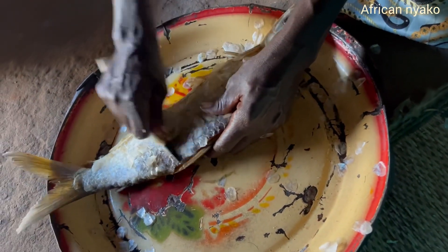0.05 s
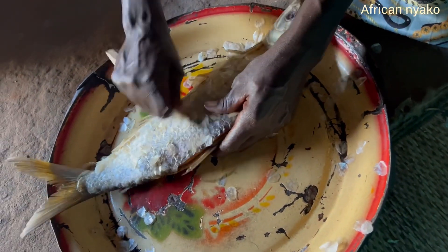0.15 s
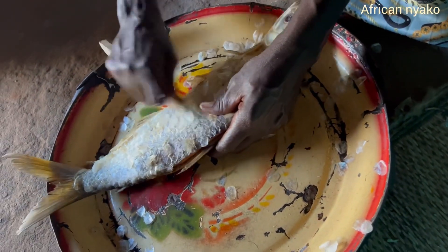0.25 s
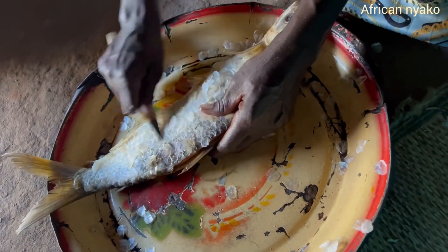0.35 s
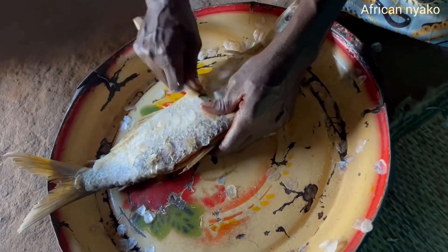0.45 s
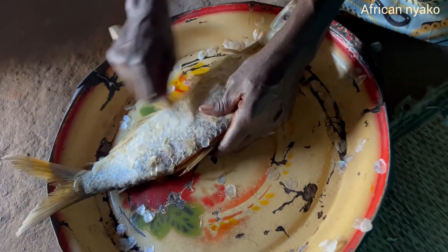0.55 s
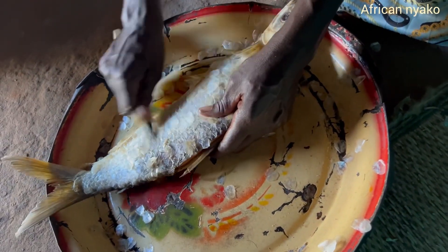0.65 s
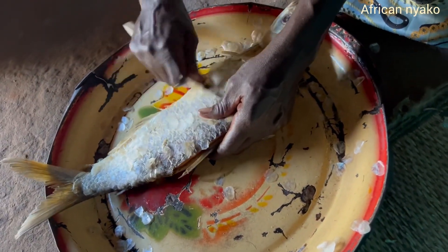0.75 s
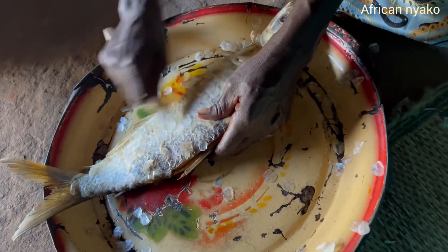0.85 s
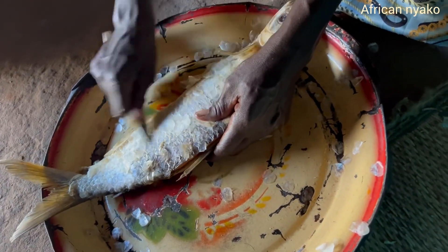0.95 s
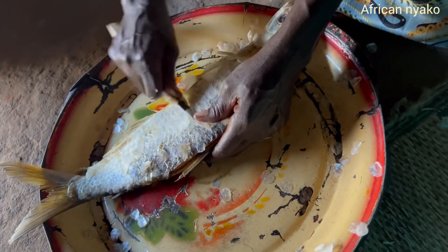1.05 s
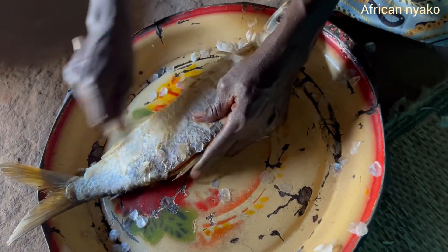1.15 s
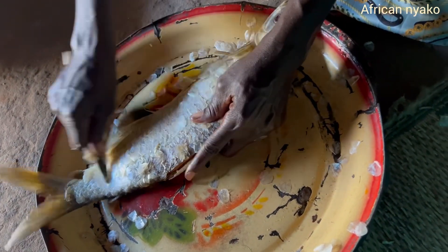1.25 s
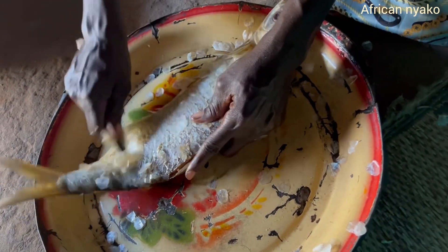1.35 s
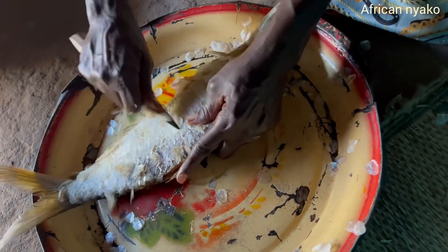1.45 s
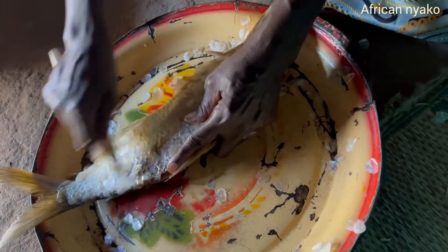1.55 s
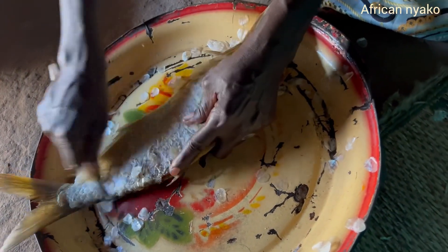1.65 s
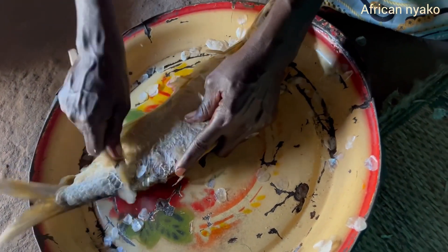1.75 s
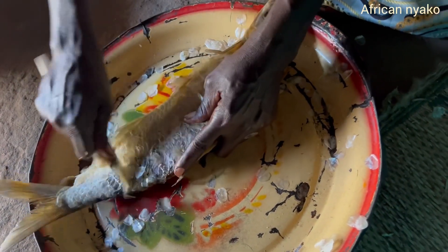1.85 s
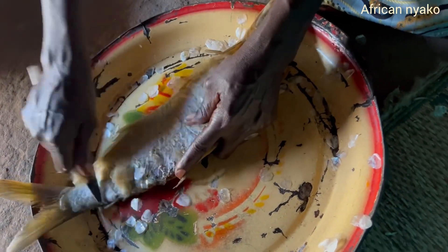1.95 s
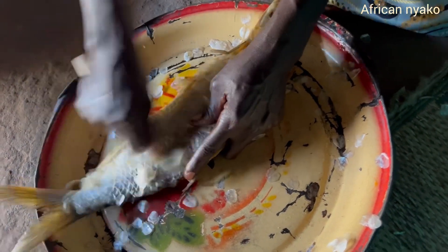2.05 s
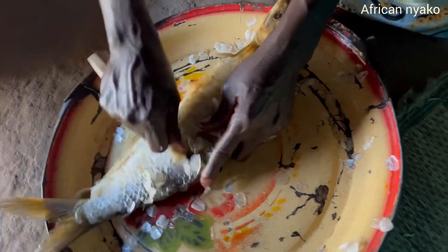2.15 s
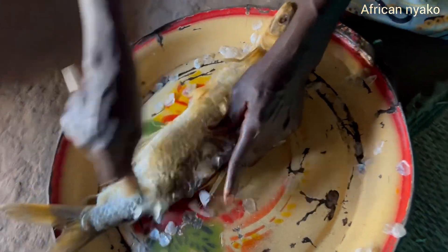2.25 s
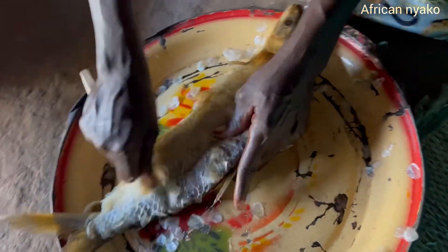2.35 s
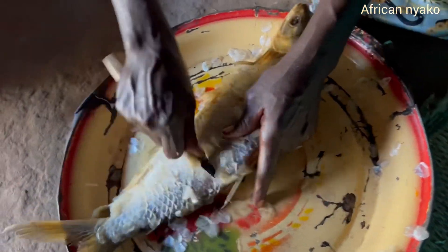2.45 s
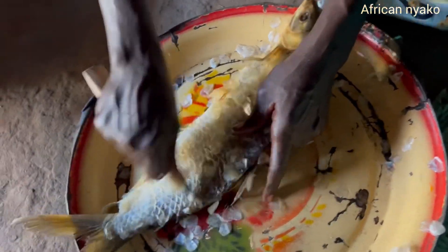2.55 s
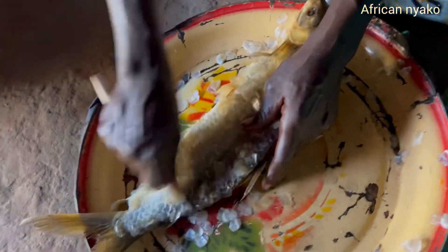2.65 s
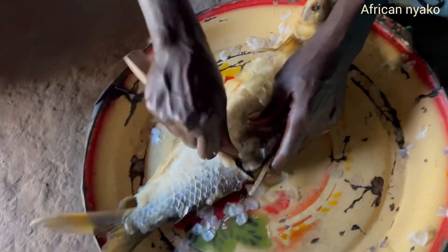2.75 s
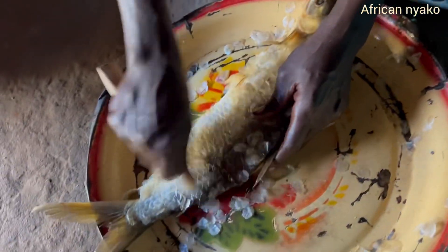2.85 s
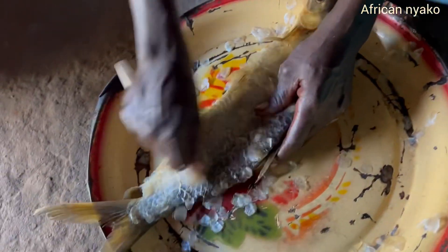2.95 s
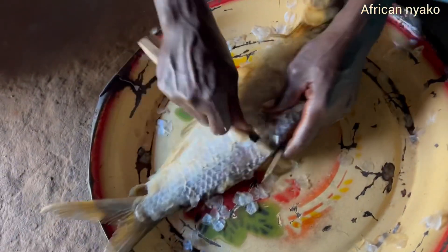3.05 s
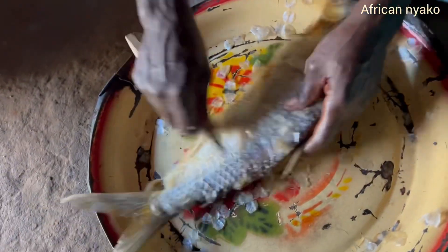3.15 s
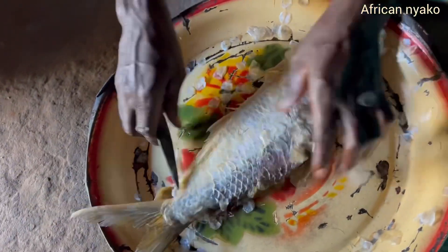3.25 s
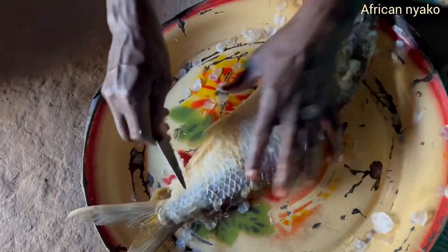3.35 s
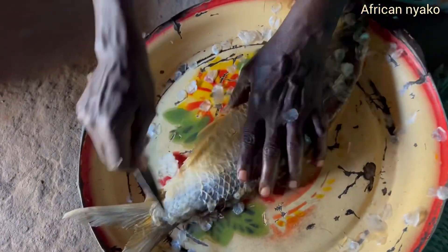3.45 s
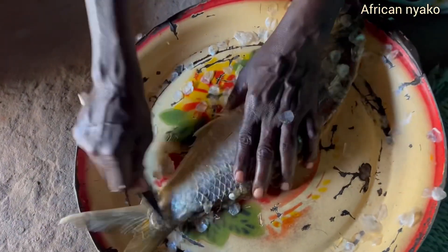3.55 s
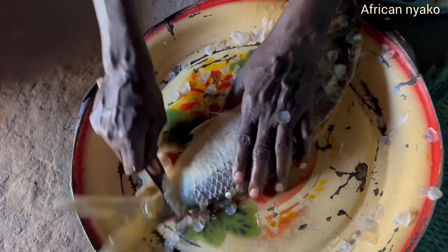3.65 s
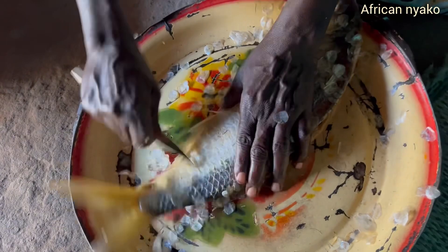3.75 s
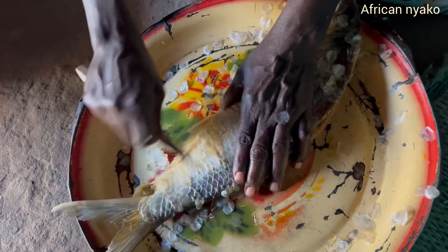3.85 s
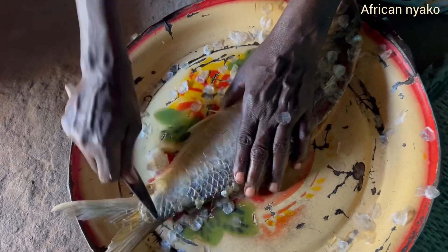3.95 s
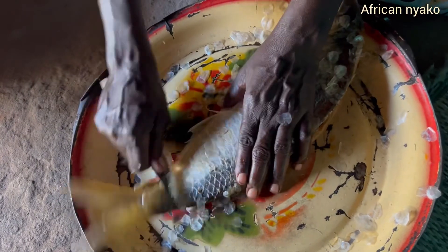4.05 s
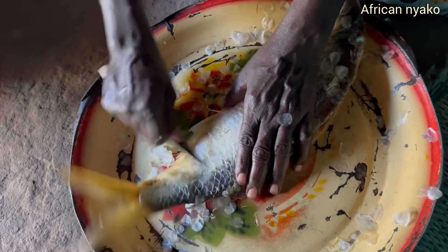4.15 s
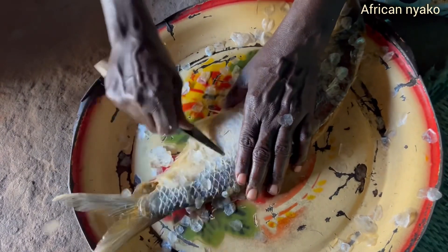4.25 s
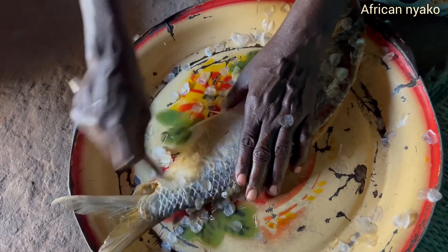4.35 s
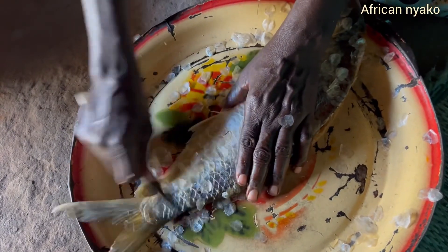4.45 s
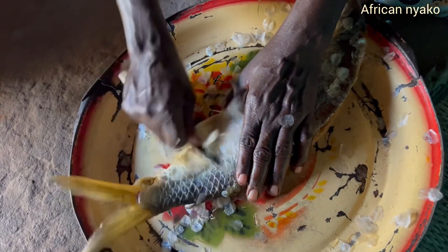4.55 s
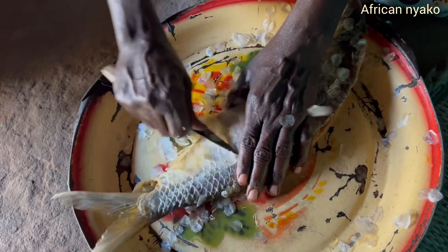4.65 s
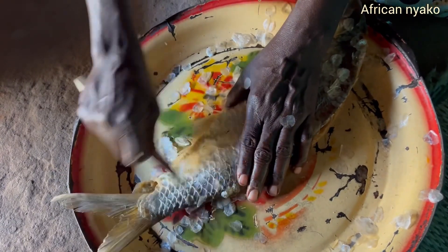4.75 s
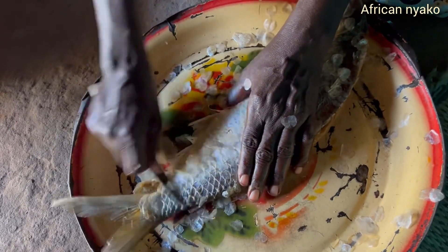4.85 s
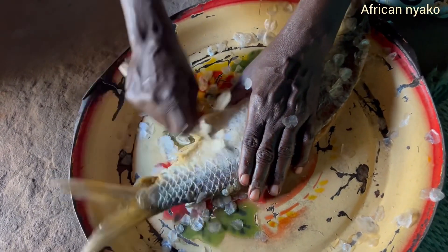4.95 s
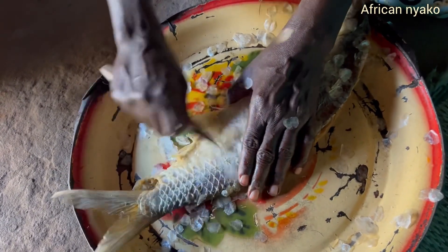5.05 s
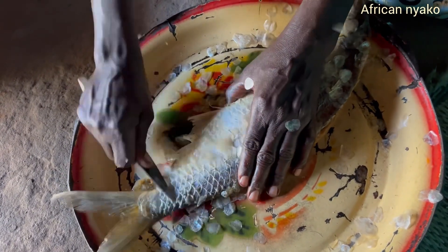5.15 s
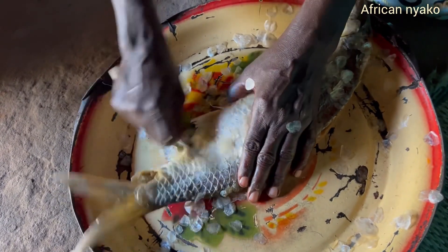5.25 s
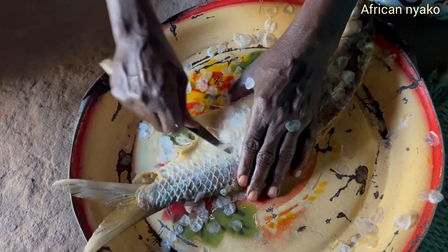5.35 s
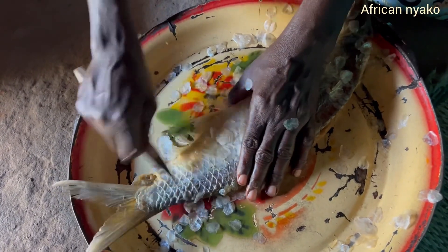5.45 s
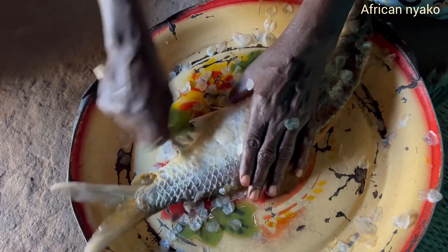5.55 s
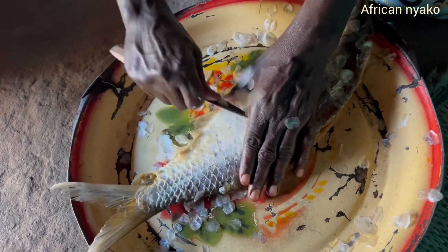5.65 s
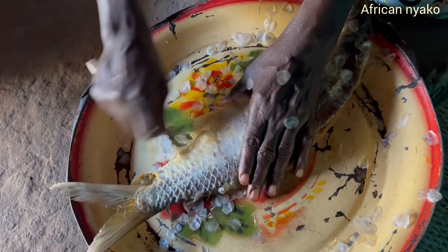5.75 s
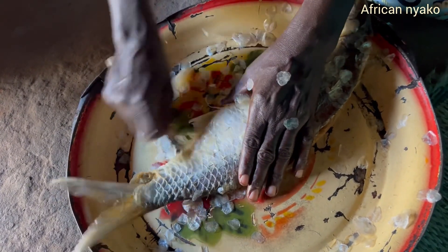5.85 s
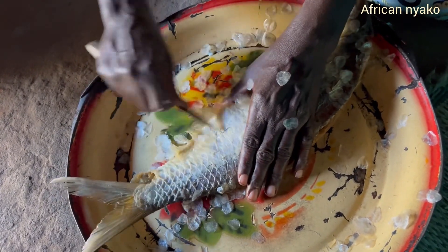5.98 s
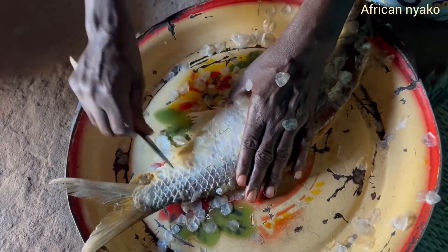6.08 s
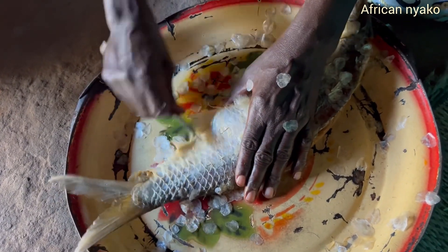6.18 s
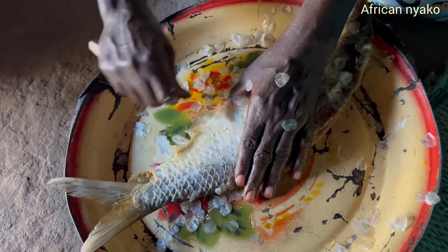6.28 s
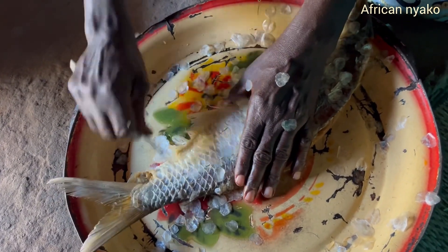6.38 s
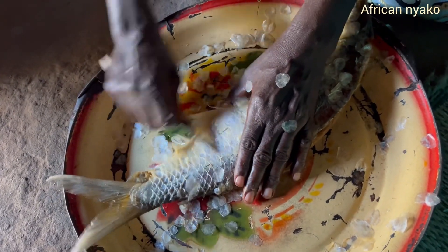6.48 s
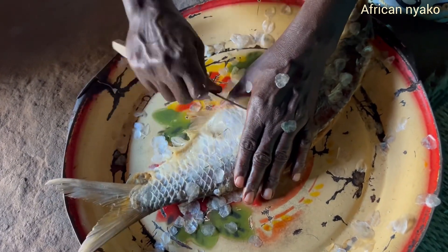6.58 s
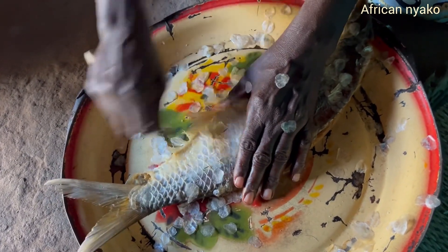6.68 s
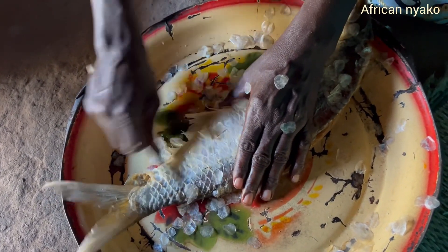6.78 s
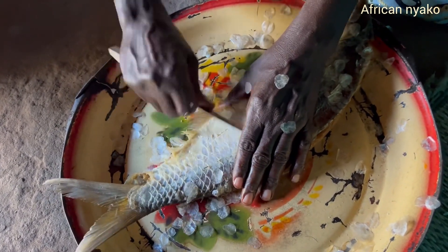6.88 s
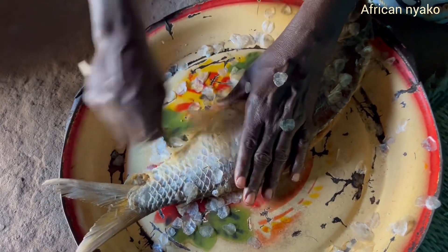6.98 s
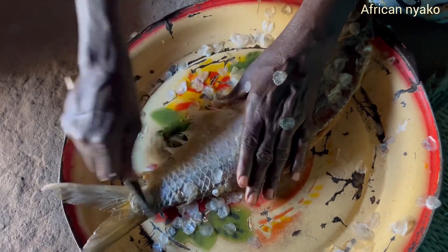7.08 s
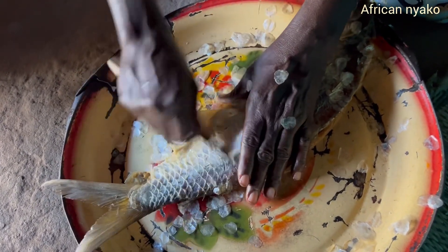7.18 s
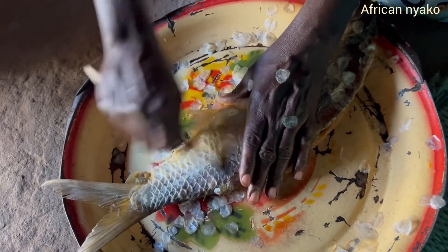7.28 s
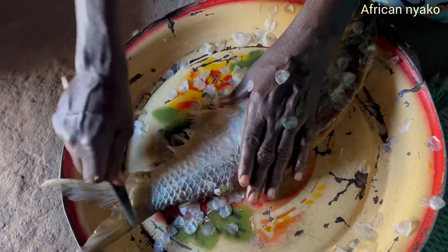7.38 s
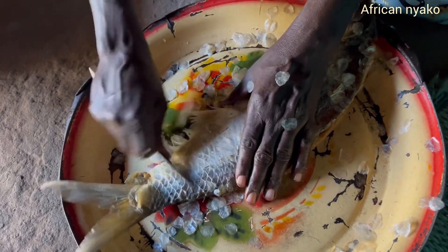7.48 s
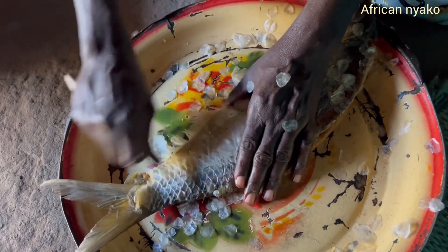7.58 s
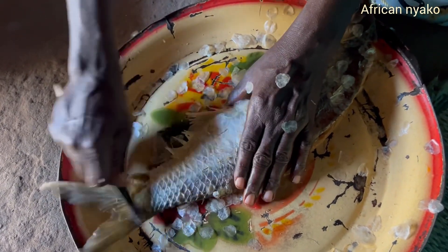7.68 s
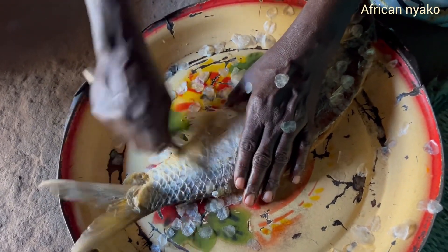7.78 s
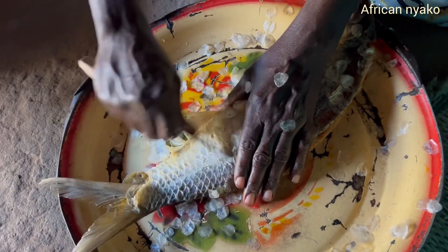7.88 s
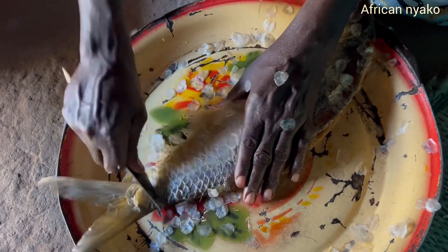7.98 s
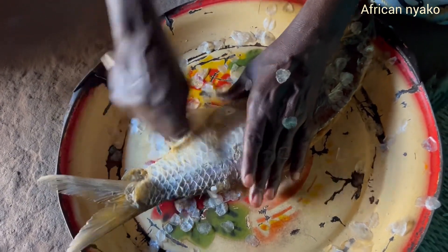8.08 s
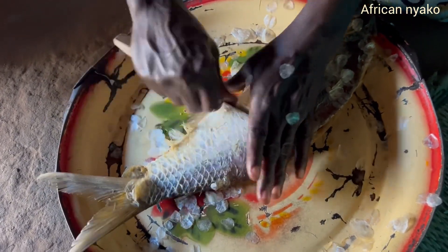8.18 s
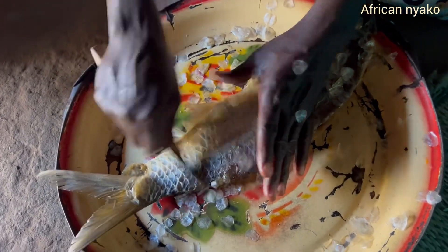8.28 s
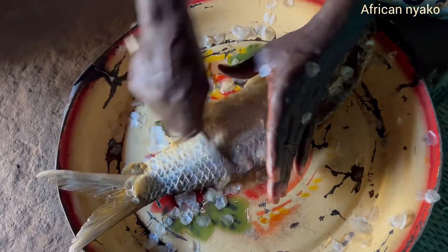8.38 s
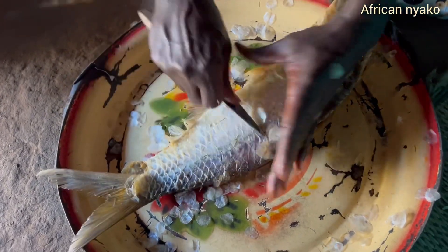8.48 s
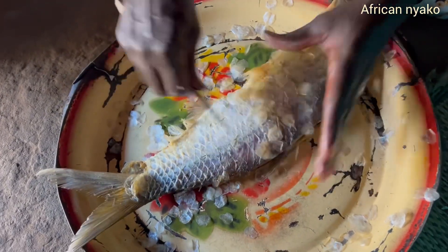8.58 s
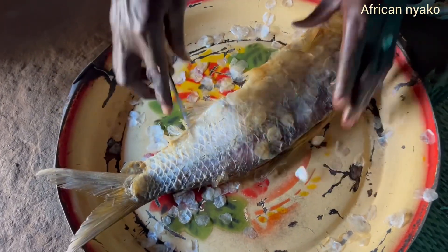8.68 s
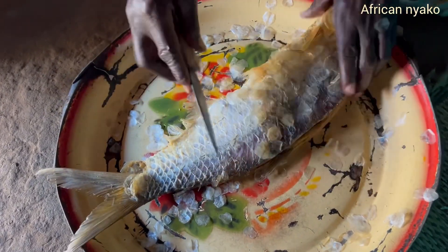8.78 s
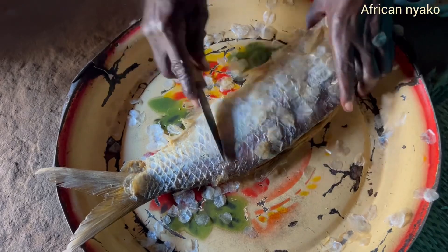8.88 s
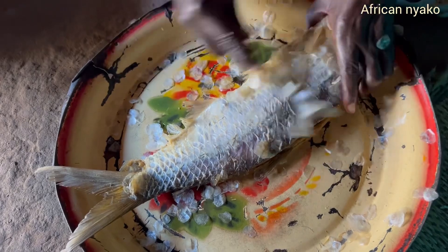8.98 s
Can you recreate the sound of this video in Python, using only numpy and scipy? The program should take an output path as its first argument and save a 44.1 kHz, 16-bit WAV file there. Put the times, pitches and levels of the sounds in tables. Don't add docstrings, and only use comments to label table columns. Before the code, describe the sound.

From the first instant a knife scrapes scales off a stiff dried fish on an enamel tray, very close to a small stereo microphone in an open yard with only a short, faint reflection. Strokes come about three a second, each a gritty bright rasp with small snaps of scales and a short metallic tray rattle. Sharp knocks stand out around 0.3, 0.65, 0.95 and 1.4 s. From 2 to 4 s the scraping is drier and crisper, with lighter bumps. From about 4.4 s strokes fall more regularly and the fish drums with hollow low thuds, strong at 4.9, 5.5 and 5.8 s. The hardest clacking strike comes at 6.4 s. Thudding strokes continue to 8 s, then scraping becomes lighter and sparser until 9 s. A low distant engine drone rises slowly in pitch beneath, with soft throbs; faint high bird peeps come near 6, 6.3 and 7.3 s.

```python
import sys
import numpy as np
from scipy import signal
from scipy.fft import rfft, irfft, next_fast_len
from scipy.io import wavfile
from scipy.ndimage import uniform_filter1d, map_coordinates

SR = 44100
rng = np.random.default_rng(int(sys.argv[2]) if len(sys.argv) > 2 else 0)


def elevation(decibels):
    levels = np.asarray(decibels, float)
    return 10 ** (levels / 20)


def int16_out(signal):
    q = np.round(np.clip(np.atleast_2d(signal).T, -1, 1) * 32767)
    wavfile.write(sys.argv[1], SR, q.astype(np.int16))


N = 397776


def unit(x):
    return x / np.sqrt(np.mean(x ** 2) + 1e-20)


def along(points, hz):
    f, v = np.transpose(points)
    return np.interp(np.log(hz + 1), np.log(f + 1), v)


def curves(rows):
    s, *cols = np.transpose(rows)
    return [np.interp(np.arange(N) / SR, s, c) for c in cols]


def wobble(rate):
    knots = rng.standard_normal(int(N * rate / SR) + 4)
    return map_coordinates(knots, [np.arange(N) * rate / SR])


def filtered(x, response):
    m = next_fast_len(N + SR // 2)
    return irfft(rfft(x, m) * response(np.fft.rfftfreq(m, 1 / SR)), m)[..., :N]


def colour(spectrum):
    return lambda f: unit(elevation(along(spectrum, f)))


def body(modes, plain_db, low_hz, high_hz):
    def response(f):
        peaks = 0
        for k, (centre, width, db) in enumerate(modes):
            damping = 1j * f * width
            peaks = peaks + (-1) ** k * elevation(db) * damping / (centre * centre - f * f + damping)
        band = (1j * f / (low_hz + 1j * f)) ** 2 * (high_hz / (high_hz + 1j * f)) ** 2
        whole = (peaks + elevation(plain_db)) * band
        return whole / np.sqrt(np.mean(np.abs(whole) ** 2))
    return response


def distance():
    # start_s, pitch_hz, level_db
    engine = [
        (0, 123, -58),
        (.9, 123.3, -48),
        (3.85, 134.2, -44.5),
        (4.0, 132.2, -56),
        (5.5, 138.8, -50),
        (7.5, 140, -52.5),
        (9.02, 139.3, -58),
    ]
    # centre_s, pitch_hz, level_db, half_length_s
    passing = [
        (.4, 85, -54.5, 0.34),
        (2.5, 99, -45, 0.18),
        (5.2, 103, -49, 0.3),
        (7.196, 99, -45, .15),
        (8.3, 58, -48.5, 0.31),
    ]
    # start_s, level_db
    rumble_level = [
        (0.0, -44.5),
        (2.11, -45),
        (5.78, -47),
        (6.51, -49.5),
        (7.06, -44),
        (8.79, -47),
        (9.02, -39),
    ]
    # pitch_hz, density_db (per Hz)
    rumble_spectrum = [(20, -35.5), (35, -25.5), (55, 3.5), (110, -0.5), (150, -3.5), (220, -19.5),
                       (400, -62.5)]
    # pitch_hz, density_db (per Hz)
    air_spectrum = [(100, -9), (200, -11.5), (500, -8.5), (1500, -2), (3000, -13), (9000, -35.5),
                    (16000, -24)]

    t = np.arange(N) / SR
    note_hz, note_db = curves(engine)
    phase = 2 * np.pi * np.cumsum(note_hz + 0.58 * wobble(6)) / SR
    note = elevation(note_db - 0.5 + 2.3 * wobble(8.4)) * np.sin(phase)
    throbs = 0
    for s, hz, db, half in passing:
        throbs = throbs + elevation(db + 3.5) * np.exp(-((t - s) / half) ** 4) * np.sin(2 * np.pi * hz * t)
    rumble = filtered(rng.standard_normal(N), colour(rumble_spectrum))
    air = filtered(rng.standard_normal(N), colour(air_spectrum))
    return note + throbs + elevation(curves(rumble_level)[0] - 4.5) * rumble + elevation(-73 + 2.2 * wobble(7.5)) * air


def grains(rate, spread_db, t60, bed):
    size_db = spread_db * np.minimum(rng.exponential(size=N), 4)
    slips = (rng.random(N) < rate / SR) * elevation(size_db)
    shape = signal.lfilter([1], [1, -elevation(-60 / (t60 * SR))], slips)
    return unit((bed + unit(shape)) * rng.standard_normal(N))


def bursts(events, levels_db, t60, blur=None):
    out, t = np.zeros(N + SR), np.arange(SR // 8) / SR
    for (s, *_, hz), db in zip(events, levels_db):
        puff = rng.standard_normal(len(t))
        if blur:
            puff = np.sin(2 * np.pi * hz * t + blur * np.cumsum(puff))
        start = round((s - .0015) * SR)
        out[start:][:len(t)] += elevation(db - 60 * t / t60) * (1 - np.exp(-t / .0004)) * puff
    return out[:N]


def patchy(x, depth_db):
    z = signal.stft(x, nperseg=256)[2]
    field = uniform_filter1d(rng.standard_normal(z.shape), 4, axis=0)
    field = uniform_filter1d(field, 14, axis=1)
    return signal.istft(z * elevation(depth_db * unit(field)), nperseg=256)[1][:N]


def knife():
    # start_s, rasp_db, tray_over_rasp_db
    strokes = [(0.0, -77, -2), (0.052, -36.5, 2.5), (0.299, -49.5, 1), (0.317, -52.5, 16.5),
               (0.367, -45, 12), (0.419, -45.5, 1), (0.511, -47.5, 6), (0.601, -66, 3), (0.614, -65.5, 4.5),
               (0.624, -48, 13), (0.666, -34, 9), (0.691, -43.5, 6.5), (0.883, -64, 3),
               (0.913, -48.5, 21.5), (0.965, -31.5, 2.5), (1.048, -58.5, 5.5), (1.202, -71, 11),
               (1.227, -45, -1), (1.247, -34.5, 0), (1.384, -39, -3.5), (1.412, -28, 7),
               (1.537, -69.5, 3.5), (1.601, -44, 6), (1.639, -32, -1.5), (1.806, -52.5, -1.5),
               (1.886, -43.5, -1.5), (2.075, -34, -0.5), (2.227, -53.5, -2.5), (2.312, -48.5, 0.5),
               (2.372, -32, -10.5), (2.442, -52.5, 8.5), (2.532, -54.5, 6.5), (2.569, -28.5, -14),
               (2.579, -56, 1), (2.619, -56.5, 1), (2.671, -28, -14.5), (2.746, -53.5, 9.5),
               (2.841, -39.5, -6.5), (2.906, -55.5, 7), (2.948, -41, 4), (3.173, -30, 2),
               (3.223, -42.5, -1.5), (3.34, -51, -4), (3.392, -39.5, 0), (3.492, -65, 1),
               (3.522, -39.5, -4), (3.704, -42, -5), (3.727, -42, -3.5), (3.789, -46, 2.5), (3.934, -81, 8),
               (3.959, -46.5, 2), (4.093, -43, -2.5), (4.121, -32, -17.5), (4.18, -40.5, -3.5),
               (4.25, -61.5, -1.5), (4.39, -67, 3), (4.412, -54, 2.5), (4.472, -28, -5.5),
               (4.787, -75.5, 5), (4.809, -41, 9), (4.844, -54.5, 8), (4.891, -25.5, -13), (5.121, -74, 5),
               (5.158, -42, 8), (5.186, -45.5, 8.5), (5.295, -32.5, -7), (5.345, -54.5, 11),
               (5.44, -59.5, -1), (5.48, -49, 8), (5.572, -36.5, -4.5), (5.762, -92, 17.5),
               (5.832, -42.5, 4), (5.874, -26.5, -3.5), (5.909, -43.5, -7), (6.084, -75, 2),
               (6.096, -67, 0), (6.109, -31, 17), (6.124, -24.5, 5.5), (6.395, -90, 2), (6.413, -84, 19),
               (6.433, -23, 11.5), (6.672, -81.5, 0), (6.735, -80, 6.5), (6.755, -49, 11.5),
               (6.842, -38, -4), (7.024, -77.5, 0), (7.061, -45.5, 7), (7.116, -42, 6), (7.323, -65, 1),
               (7.336, -78.5, -2.5), (7.348, -41, 1), (7.381, -47, 6.5), (7.441, -40.5, 2),
               (7.608, -68.5, -0.5), (7.638, -48, 0), (7.735, -39.5, 7), (7.9, -66, -0.5),
               (8.034, -51.5, 14), (8.114, -40.5, -2), (8.159, -53, 1.5), (8.311, -61, 8.5),
               (8.381, -37.5, -5), (8.521, -63.5, -4), (8.693, -59.5, 0), (8.703, -45, 0),
               (8.715, -42, 4.5), (8.832, -58, -0.5), (9.02, -32.5, -9.5)]
    # peak_s, peak_db, crack_over_peak_db, ring_hz
    snaps_and_knocks = [(0.022, -54, -8, 810), (0.0383, -15.5, -4, 1450), (0.07, -20, 4, 1575),
                        (0.3194, -6.5, -44, 1620), (0.3569, -10.5, -30, 1494), (0.6258, -7.5, -36, 1510),
                        (0.6569, -8.5, -24, 3470), (0.7158, -19.5, -3, 802), (0.8989, -18.5, -27, 1540),
                        (0.9133, -38, -13, 1540), (0.9522, -5, -14, 3475), (1.2136, -29.5, -19, 1360),
                        (1.2352, -15.5, -17, 3510), (1.3534, -13.5, 2.5, 3510), (1.4088, -4, -2, 1070),
                        (1.589, -26, -6, 2300), (1.6053, -12.5, -4.5, 1254), (1.8863, -19, -19, 1300),
                        (2.0198, -19, 9, 2960), (2.0632, -9.5, -6, 830), (2.3184, -27, -5, 850),
                        (2.3575, -16, 5, 1333), (2.3725, -15, 4.5, 1360), (2.54, -35, 8, 2460), (2.5544, -25, 0, 2440),
                        (2.6548, -22.5, 2, 942), (2.829, -30.5, 5, 1530), (2.9854, -15, 6.5, 2475),
                        (3.2395, -22.5, -1, 807), (3.3852, -23, -6, 974), (3.515, -24, -6, 897), (3.72, -21, 8, 1520),
                        (3.7446, -23, 4, 1660), (3.7773, -11, -7.5, 1097), (3.9598, -23, 2, 1090),
                        (4.0023, -22.5, 4, 1260), (4.016, -17, 1, 990), (4.121, -8, -8.5, 1630),
                        (4.412, -19, -7, 1310), (4.7357, -32.5, -5.5, 1330), (4.8078, -17, -1, 1123),
                        (4.866, -16.5, -5, 850), (4.8923, -12, 1, 770), (4.922, -13.5, 2, 1680),
                        (5.1582, -9, -19, 1460), (5.2473, -18.5, 0, 1560), (5.2837, -30.5, -7, 2440),
                        (5.2967, -20, -4, 2710), (5.476, -19, -6, 1200), (5.5119, -21.5, -14, 1040),
                        (5.5615, -14.5, -2, 2330), (5.8267, -14.5, -9, 1380), (5.8593, -16, -6, 796),
                        (6.109, -6.5, -25, 1460), (6.1594, -5, -24, 1260), (6.1953, -16.5, 6, 1310),
                        (6.428, 4.5, -27, 1476), (6.7552, -21, -7, 1140), (6.8282, -16.5, -4, 3300),
                        (6.8516, -19.5, 4.5, 846), (7.0492, -15.5, -10, 1136), (7.3468, -18, -4, 1130),
                        (7.4393, -15.5, 0, 867), (7.64, -18.5, -10, 1154), (7.9798, -26.5, 0, 1120),
                        (8.2656, -30, 8.5, 2190), (8.357, -27, 1, 1590), (8.388, -21, -1, 1190),
                        (8.7032, -19, -12, 1170), (8.8643, -29, -20, 1350), (8.911, -30.5, -15, 1320),
                        (8.961, -25.5, -3, 770),
                        (4.1765, -16, -9, 1110), (4.59, -17.5, -14, 1120), (4.9708, -20.5, -16, 1150),
             (6.4373, 3, -20, 2650), (6.4594, -6, -15, 2670), (6.489, -19, 2, 2710),
             (6.6114, -37.5, -13, 1030), (7.938, -42, 3, 939), (8.4345, -24, -2, 3140),
             (8.535, -42, 2, 813), (8.5989, -33, -1, 1246)]
    # pitch_hz, density_db (per Hz)
    scale_spectrum = [(1500, -31), (2500, -16.5), (4000, -9.5), (6000, -1), (8400, 0), (10000, 0),
                      (12000, 3), (14000, -2), (15800, -5)]
    # pitch_hz, width_hz, level_db
    tray_modes = [(824, 13, -4), (1190, 76, 3.5), (1460, 60, -2), (1720, 60, 0), (1830, 20, -34.5),
                  (2342, 200, -1.5), (2650, 60, -13), (2987, 17, 2.5), (3160, 60, -8), (3340, 200, 0),
                  (4240, 140, -21), (4750, 67, 3)]

    rasp_db, tray_db = curves(strokes)
    edge = elevation(rasp_db - 1.0 + 1.5 * wobble(45)) * grains(700, spread_db=5.5, t60=0.012, bed=0.49)
    rattle_db = rasp_db + tray_db - 3.0 + 3.8 * wobble(40)
    rattle = elevation(rattle_db) * grains(500, spread_db=3.5, t60=0.0077, bed=0.65)
    tray = body(tray_modes, plain_db=-7, low_hz=600, high_hz=3840)
    scrape = patchy(filtered(edge, colour(scale_spectrum)) + filtered(rattle, tray), depth_db=1.8)

    hits = snaps_and_knocks
    _, peak_db, crack_db, _ = np.transpose(hits)
    cracks = filtered(bursts(hits, peak_db + crack_db - 3, t60=.016), colour(scale_spectrum))
    knocks = filtered(bursts(hits, peak_db - 12.5, t60=0.037), tray)
    rings = bursts(hits, peak_db - 12.5, t60=0.055, blur=0.075)
    return scrape + cracks + knocks + rings


def fish():
    # start_s, level_db
    pressure = [(0.0, -65), (0.152, -43.5), (0.307, -61), (0.317, -33.5), (0.601, -63), (0.624, -30),
                (0.654, -30), (0.836, -63.5), (0.89, -65), (0.913, -26), (0.96, -33), (1.167, -76.5),
                (1.252, -39), (1.349, -47.5), (1.372, -37), (1.414, -33.5), (1.551, -58), (1.654, -38),
                (1.798, -58), (1.943, -48.5), (1.993, -29.5), (2.222, -57.5), (2.312, -50), (2.332, -29),
                (2.437, -50.5), (2.614, -58), (2.644, -31), (2.696, -37.5), (2.856, -59), (2.906, -51),
                (2.943, -29), (3.013, -44), (3.233, -42.5), (3.248, -37), (3.293, -53.5), (3.41, -44.5),
                (3.49, -55), (3.617, -40), (3.714, -54), (3.746, -26.5), (3.759, -46), (3.789, -34.5),
                (3.939, -74), (3.961, -44.5), (4.023, -27), (4.073, -50), (4.185, -29.5), (4.235, -54),
                (4.383, -74.5), (4.457, -23), (4.749, -65.5), (4.881, -22), (5.059, -61), (5.133, -70),
                (5.158, -32.5), (5.213, -22), (5.238, -40), (5.458, -61), (5.468, -39), (5.502, -41),
                (5.53, -23), (5.702, -67), (5.812, -46.5), (5.834, -19), (5.984, -63), (6.089, -71.5),
                (6.114, -22), (6.124, -24.5), (6.363, -73.5), (6.413, -53), (6.433, -20.5), (6.66, -70),
                (6.732, -76), (6.745, -37.5), (6.782, -23), (6.979, -70), (7.089, -37), (7.131, -21.5),
                (7.303, -68.5), (7.353, -45), (7.431, -44), (7.451, -20), (7.62, -67), (7.717, -34.5),
                (7.727, -17.5), (7.949, -72.5), (8.034, -20), (8.244, -71), (8.281, -39.5), (8.326, -53),
                (8.366, -31.5), (8.501, -64.5), (8.685, -64), (8.713, -39), (8.85, -67.5), (8.867, -29),
                (8.9, -44.5), (9.02, -48)]
    # peak_s, peak_db, pitch_hz
    bumps = [(0.316, -28, 250), (0.628, -21, 223), (0.653, -15.5, 237), (0.91, -22.5, 398),
             (1.37, -16.5, 167), (1.408, -17, 630), (1.984, -22, 571), (2.33, -17.5, 390),
             (2.641, -26.5, 328), (2.931, -17, 385), (3.736, -14.5, 320), (3.958, -38, 592),
             (4.009, -14.5, 334), (4.129, -16.5, 345), (4.445, -18, 651), (4.799, -29, 194),
             (4.864, -8.5, 361), (4.902, -15, 218), (5.157, -23, 205), (5.195, -17, 345),
             (5.516, -10.5, 326), (5.832, -11, 207), (6.111, -16, 767), (6.429, -9.5, 258),
             (6.767, -12.5, 361), (7.113, -12.5, 608), (7.443, -9, 404), (7.726, -11, 382),
             (8.024, -12, 598), (8.865, -19.5, 283)]
    # pitch_hz, width_hz, level_db
    fish_modes = [(197, 44, 1), (260, 71, -2), (379, 70, -2.5), (618, 98, 5)]

    drum_db, = curves(pressure)
    push = elevation(drum_db - 1.5) * grains(400, spread_db=1.5, t60=.02, bed=2)
    swelling = np.tanh(uniform_filter1d(np.gradient(drum_db) * SR, 900) / 400)
    spot_hz = np.sqrt(320 * curves(bumps)[1]) * np.exp(0.31 * swelling)
    shares = []
    for hz, _, db in fish_modes:
        nearness = np.exp(-(np.log(spot_hz / hz) / 0.37) ** 2)
        shares.append(elevation(db - 4) * (0.41 + nearness))

    def flesh(f):
        modes = np.array([body([m], plain_db=-20, low_hz=110, high_hz=900)(f) for m in fish_modes])
        return modes / (1 + 1j * f / 1100) ** 2

    drum = filtered(shares * push, flesh).sum(axis=0)
    _, thud_db, thud_hz = np.transpose(bumps)
    return elevation(1.0) * drum + bursts(bumps, thud_db - 4, t60=0.084, blur=0.034)


def bird():
    # start_s, start_hz, end_hz, level_db, length_s
    peeps = [
        (5.975, 6900, 6600, -67, .06),
        (6.312, 6800, 6500, -63, .07),
        (7.29, 6700, 6400, -68, .05),
    ]
    out, hoarse_hz = 0, 300 * wobble(700)
    for s, start_hz, end_hz, db, length in peeps:
        u = np.clip((np.arange(N) / SR - s) / length, 0, 1)
        pitch_hz = start_hz + (end_hz - start_hz) * np.sqrt(u) + hoarse_hz
        swell = u ** .3 * (1 - u) * 2
        out = out + elevation(db) * swell * np.sin(2 * np.pi * np.cumsum(pitch_hz) / SR)
    return out


def echoes(x):
    # pitch_hz, t60_s
    yard = [(200, 0.11), (2000, 0.14), (10000, 0.12)]
    hz, t, z = signal.stft(rng.standard_normal(SR // 4), SR, nperseg=128)
    decay = elevation(-60 * t / along(yard, hz)[:, None])
    tail = signal.istft(z * decay, SR, nperseg=128)[1]
    return signal.fftconvolve(x, tail / np.linalg.norm(tail))[:N]


def scattered(x):
    z = signal.stft(x, nperseg=256)[2]
    turned = z * np.exp(2j * np.pi * rng.random(z.shape))
    return np.sqrt(2) * signal.istft(turned, nperseg=256)[1][:N]


def scene():
    # pitch_hz, likeness (0 to 1)
    alike = [(60, .98), (400, .98), (900, .85), (1500, .7), (3500, .85), (7000, .85), (8400, 1), (16000, 1)]
    far = distance()
    near = knife() + fish()
    direct = near + elevation(-17.5) * echoes(near) + far + bird()
    turn = lambda f: np.arccos(along(alike, f)) / 2
    mid = filtered(direct, lambda f: np.cos(turn(f)))
    side = filtered(scattered(direct), lambda f: np.sin(turn(f)))
    return np.array([mid + side, mid - side])


def lead(f):
    # pitch_hz, lead_rad
    left_lead = [(200, 0), (700, .5), (1200, .6), (2200, 0), (3000, .7), (6000, .3), (7500, .5), (8400, 0)]
    turn_hz, turn_step_hz = 8430, 3600
    slip = 2 * np.pi * np.maximum(f - turn_hz, 0) / turn_step_hz
    return along(left_lead, f) - slip + .48 * np.sin(2 * slip)


def band_limit(x):
    return signal.sosfilt(signal.butter(12, 17000, fs=SR, output="sos"), x)


def record(dry):
    # pitch_hz, level_db
    port = [(25, -20), (55, 0), (15900, 0), (16200, -32), (17000, -60)]
    # pitch_hz, level_db
    tilt = [(300, 0), (700, 3), (4000, 3), (7000, 3), (8400, 0)]
    half = np.array([[.5], [-.5]])

    def pickup(f):
        level = elevation(along(port, f) + half * along(tilt, f))
        return level * np.exp(1j * half * lead(f))

    return band_limit(filtered(dry, pickup))


dry = scene()
out = record(dry)
int16_out(out)
```